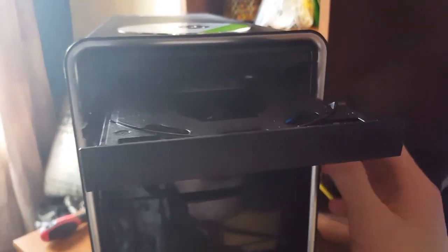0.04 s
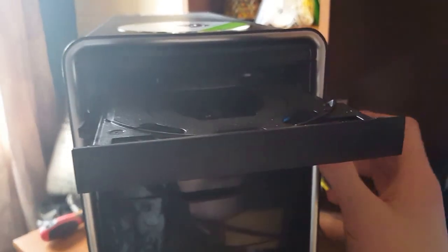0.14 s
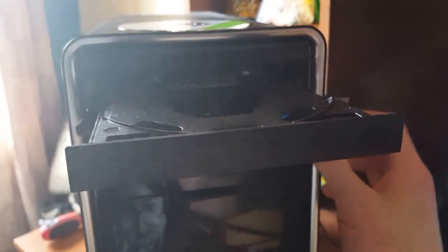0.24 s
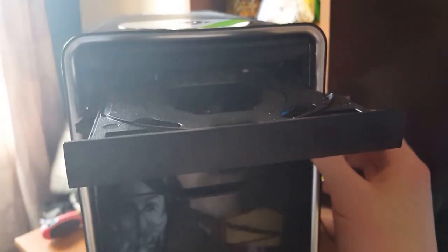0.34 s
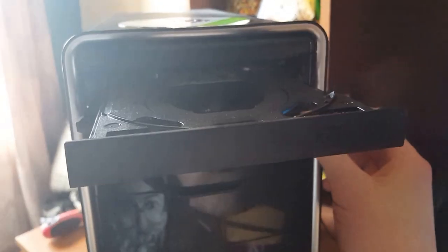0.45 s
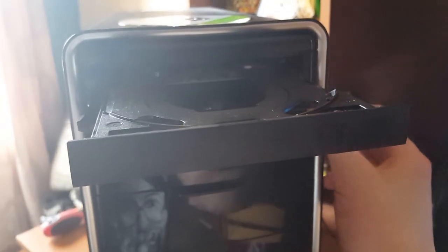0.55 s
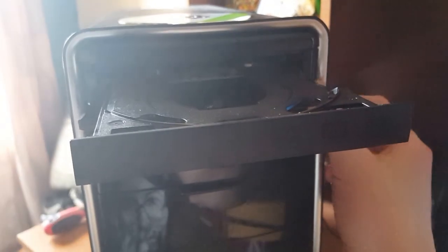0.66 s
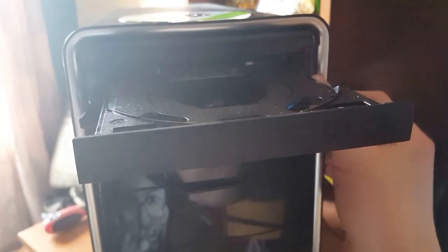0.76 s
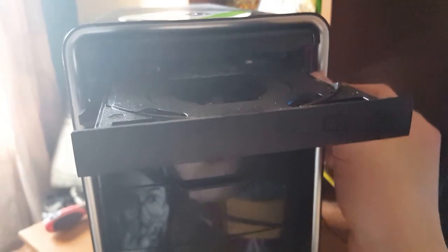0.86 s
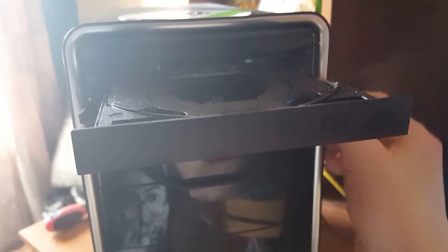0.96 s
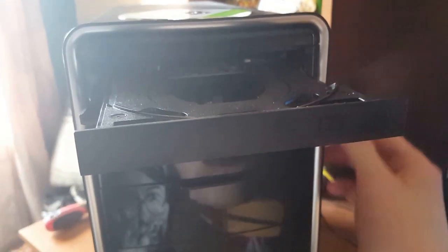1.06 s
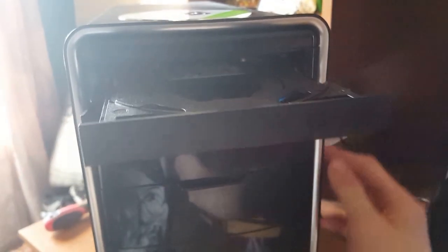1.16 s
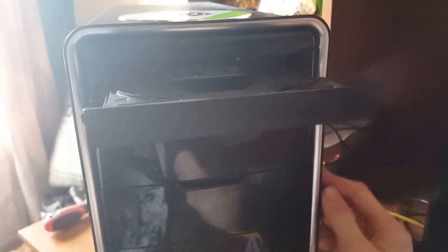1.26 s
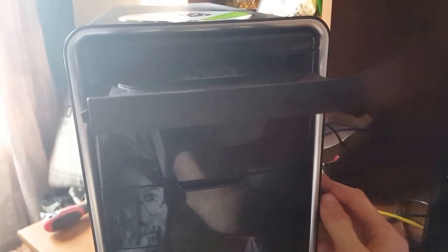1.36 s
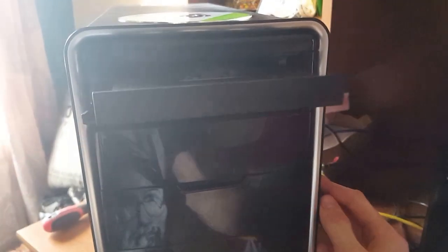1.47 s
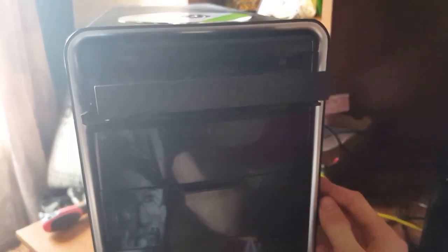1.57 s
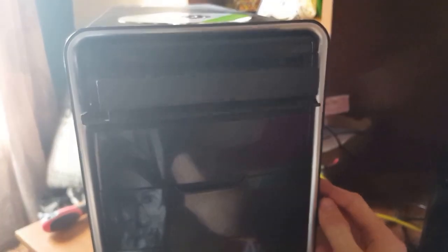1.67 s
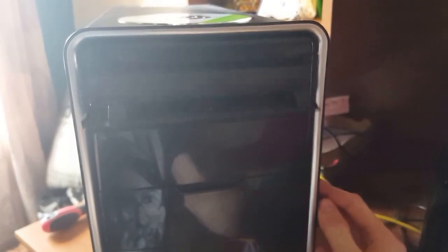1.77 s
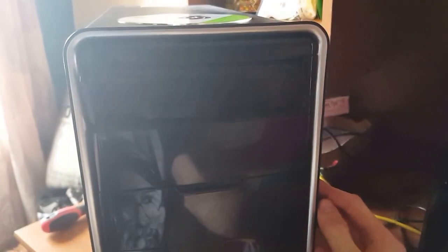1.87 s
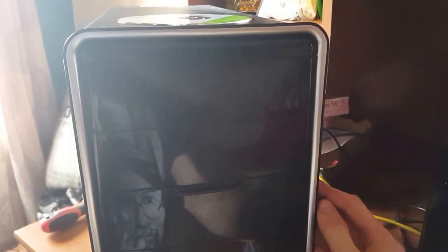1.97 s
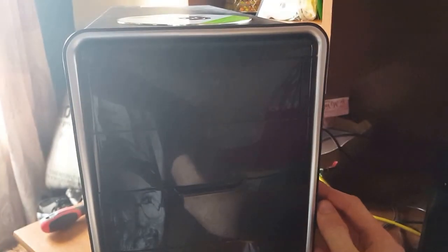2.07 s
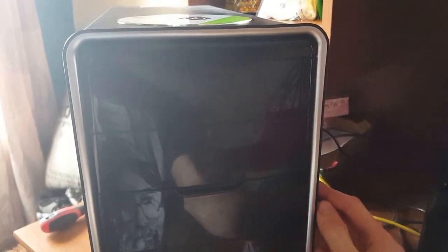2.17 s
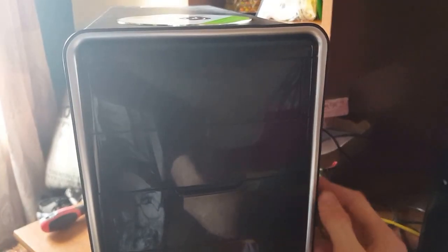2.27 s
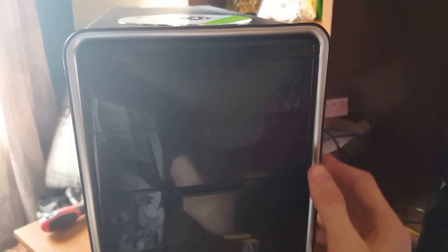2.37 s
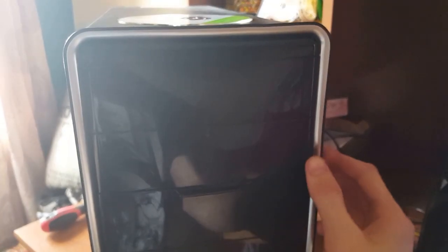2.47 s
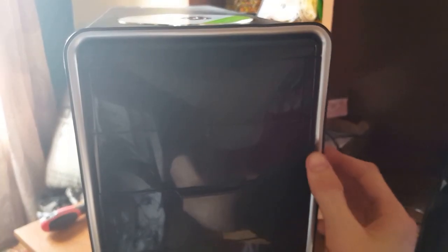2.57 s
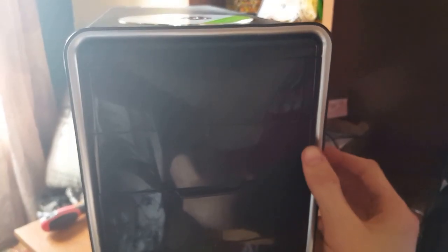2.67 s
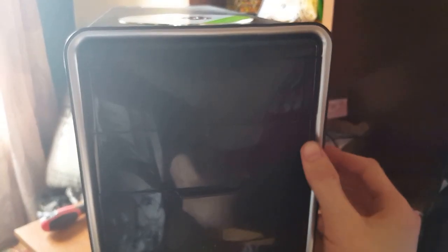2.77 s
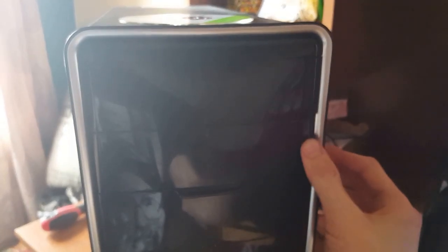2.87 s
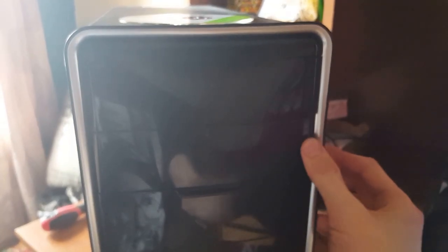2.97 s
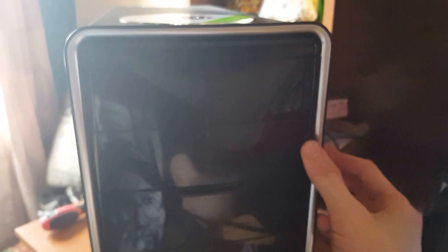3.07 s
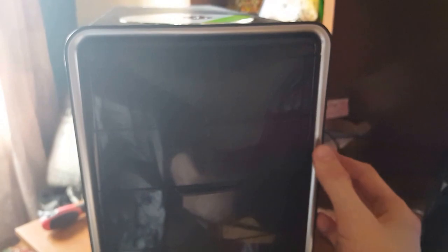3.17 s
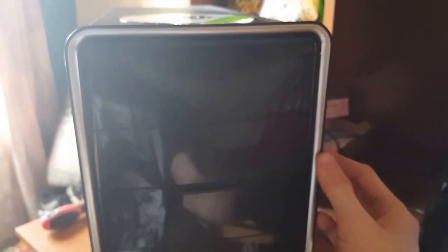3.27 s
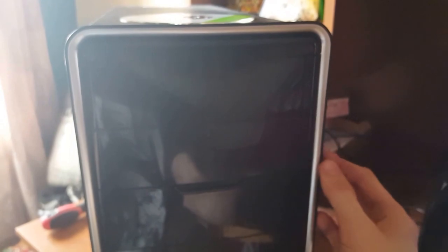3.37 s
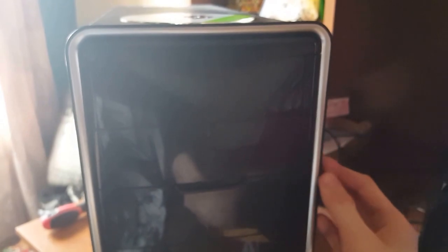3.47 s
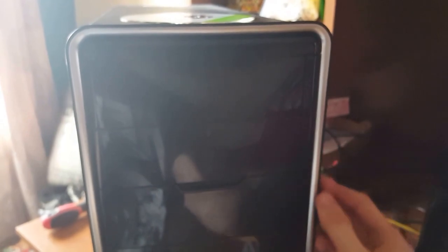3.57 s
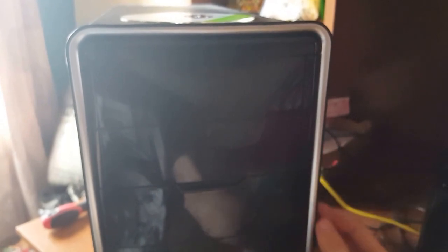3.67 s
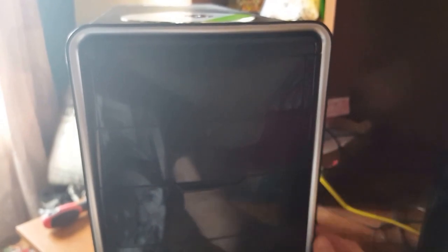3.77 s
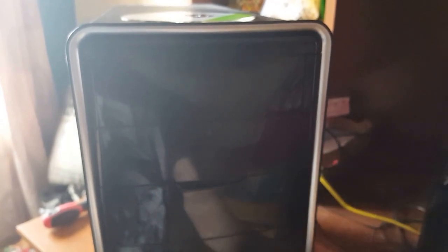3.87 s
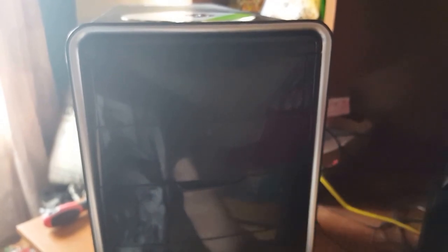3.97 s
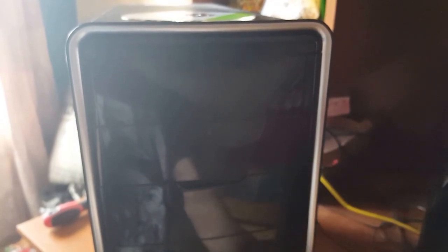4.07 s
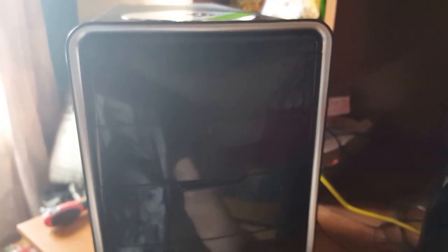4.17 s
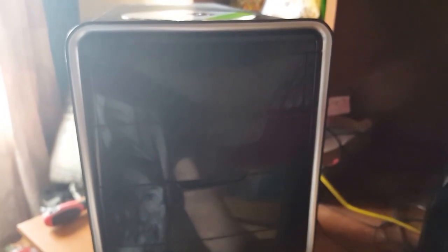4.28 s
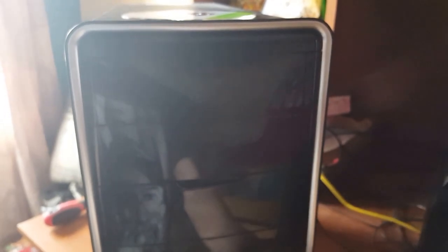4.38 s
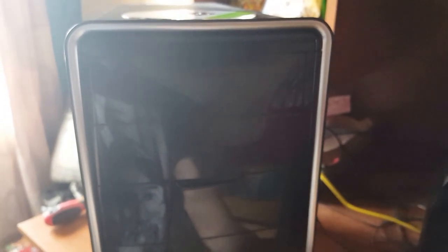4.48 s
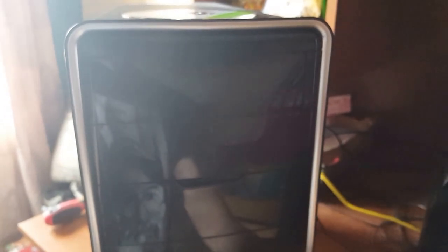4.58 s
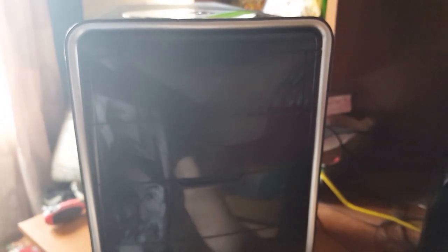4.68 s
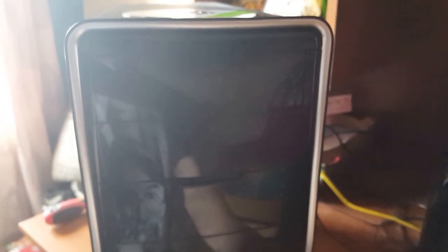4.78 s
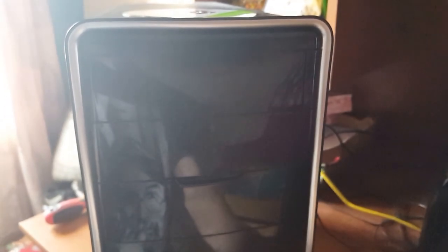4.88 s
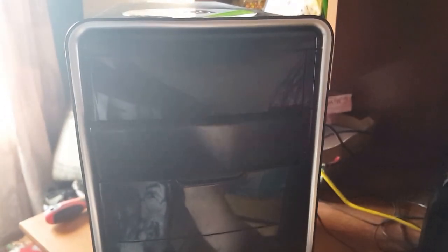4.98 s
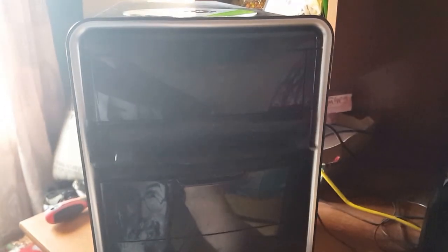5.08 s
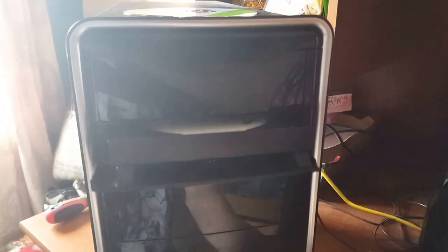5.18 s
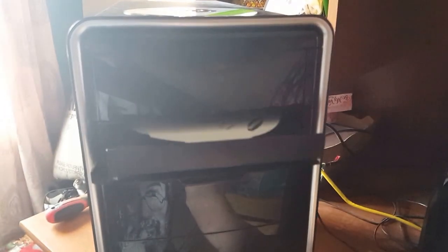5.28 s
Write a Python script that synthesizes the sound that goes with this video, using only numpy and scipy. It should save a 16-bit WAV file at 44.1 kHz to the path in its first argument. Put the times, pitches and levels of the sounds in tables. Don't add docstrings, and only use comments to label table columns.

```python
import sys
import numpy as np
from scipy import signal
from scipy.fft import rfft, irfft, next_fast_len
from scipy.io import wavfile
from scipy.ndimage import uniform_filter1d

SR = 44100
rng = np.random.default_rng(int(sys.argv[2]) if len(sys.argv) > 2 else 0)


def boost_factor(decibels):
    exponent = np.asarray(decibels, float) / 20
    return 10 ** exponent


def log_audio(samples):
    frames = np.atleast_2d(samples).T
    limited = np.clip(frames, -1, 1)
    pcm = np.round(limited * 32767).astype(np.int16)
    wavfile.write(sys.argv[1], SR, pcm)


N = 235229


def evened(x):
    return x / np.sqrt(np.mean(x ** 2) + 1e-20)


def early(x):
    return x / x[:880].std()


def read(points, hz):
    f, value = np.transpose(points)
    return np.interp(np.log(hz + 1), np.log(f + 1), value)


def add(mix, s, sound):
    part = mix[..., max(round(s * SR), 0):][..., :sound.shape[-1]]
    part += sound[..., :part.shape[-1]]


def decay(size, db_per_s):
    return boost_factor(-db_per_s * np.arange(size) / SR)


def highpass(x, order, hz):
    return signal.sosfilt(signal.butter(order, hz, "high", fs=SR, output="sos"), x)


def ring(x, modes, low_hz, high_hz):
    hz = np.fft.rfftfreq(x.shape[-1], 1 / SR) + 1
    body = 0
    for k, (f, width, db) in enumerate(modes):
        body = body + (-1) ** k * boost_factor(db) / (1 + 1j * (hz - f * f / hz) / width)
    low_cut = (1j * hz / low_hz / (1 + 1j * hz / low_hz)) ** 2
    high_cut = 1 / (1 + 1j * hz / high_hz) ** 2
    return irfft(rfft(x) * body * low_cut * high_cut, x.shape[-1])


def grit(size, per_s, uneven_db):
    hit, big, sign = rng.random(size), rng.exponential(1, size), rng.standard_normal(size)
    return (hit < per_s / SR) * boost_factor(uneven_db * np.minimum(big, 4)) * sign


def apart(x, lag):
    return np.array([x, np.roll(x, lag)])


def struck(modes):
    chance = rng.standard_normal((len(modes), 2))
    return [(f * (1 + .025 * a), width, db + 1.5 * b) for (f, width, db), (a, b) in zip(modes, chance)]


def chatter(peak_db, t60):
    t = np.arange(16384) / SR
    fade = boost_factor(-60 * t / max(t60, .01)) + 0.13 * boost_factor(-60 * t / 0.021)
    contacts = grit(len(t), 7000, 0.91) * fade * (t < .25) * (1 - np.exp(-t / 0.0005))
    contacts[[0, 30]] = .6, 3.4 * boost_factor(.35 * (peak_db + 30))
    return contacts


# frequency in Hz, width in Hz, level in dB.
SHELL = [(1468, 87, -8.5), (1734, 475, -7), (2050, 400, -0.5), (2230, 355, 3), (2450, 240, -3),
         (2800, 190, -13)]
PANEL = [(831, 233, -2), (1004, 57, 3), (1260, 230, -3.5)]
THUD = [(200, 140, -6), (274, 120, -3), (395, 110, -1), (448, 70, 2), (596, 160, -4.5)]


def click(push, peak_db, hz, thud_db, panel_db):
    shell = ring(push * decay(len(push), 150), struck(SHELL), 640, 9000)
    shell = shell + 0.7 * ring(shell + 1.2 * push, [(hz, 200, 0)], 100, 30000)
    panel = ring(push, struck(PANEL), 570, 2100)
    thud = ring(push * decay(len(push), 100), struck(THUD), 130, 2000)
    body = shell / abs(shell).max() + boost_factor(panel_db - 5.0) * early(panel) + boost_factor(thud_db - 8.5) * early(thud)
    return boost_factor(peak_db - 3.0) * body


# frequency in Hz, width in Hz, level in dB.
SNAP = [(3153, 470, 4.5), (4620, 360, 4), (5043, 170, 6.5), (5990, 870, 2.5)]
CRISP = [(7330, 740, 3), (7840, 680, 3.5)]
FIZZ = [(9000, 5100, 4), (12950, 2500, 4), (15500, 2000, 2.5)]


def edge(push, peak_db, crisp_db, fizz_db):
    push = np.clip(push, -4, 4) * decay(len(push), 420)
    snap = ring(push, struck(SNAP), 3300, 12000)
    crisp = ring(push, struck(CRISP), 4500, 12000)
    fizz = ring(push * decay(len(push), 500), struck(FIZZ), 8000, 30000)
    bright = snap / abs(snap).max() + boost_factor(crisp_db) * early(crisp) - boost_factor(fizz_db + 1.0) * early(fizz)
    return boost_factor(peak_db + 1.0) * apart(bright, rng.integers(0, 14))


def knocks(rows, t60, panel_db, crisp_db, fizz_db):
    out = np.zeros((2, N))
    usual_db = np.mean(rows, axis=0)[1]
    for s, peak_db, hz, thud_db, edge_db in rows:
        push = chatter(peak_db, t60 * boost_factor(-0.26 * (peak_db - usual_db)))
        shine_db = -0.26 * edge_db
        moved_db = panel_db + 0.078 * (thud_db + 13.5) - 0.19 * (peak_db + 33)
        add(out, s, click(push, peak_db, hz, thud_db, moved_db))
        add(out, s, edge(push, peak_db + edge_db, crisp_db + shine_db, fizz_db + shine_db))
    return out


# chatter t60 in seconds, panel in dB, crisp in dB, fizz in dB.
FINGER = [(.0216, -37.5, 2360, -16, -8.5), (.106, -34.5, 1960, -13, -16.5), (.1855, -38.5, 2110, -16, -12),
          (.195, -35.5, 905, -19, -2), (.3635, -38.5, 2360, -13, -1.5), (.539, -50.5, 1680, -9, -13),
          (.5806, -30, 1550, -14, -6), (.695, -52, 1970, -39, -6), (.811, -18, 1630, -57, -14),
          (.873, -49.5, 902, -4, -8), (.961, -38, 2330, -28, -22), (.969, -31, 1560, -10, -7),
          (.991, -52, 1100, -30, 1), (1.0293, -27, 1500, -32, -5), (1.095, -48.5, 2270, -30, -11)]
FINGER_KIND = (0.1535, -9.5, -18.5, -28)
TAPS = [
    (2.353, -47, 2050, -31, -17.5),
    (2.742, -46, 2130, -26, -8.5),
    (2.906, -51, 1420, -27, -10),
    (2.9225, -23, 1550, -25.5, -13),
    (3.183, -37.5, 1720, -13.5, -7.5),
    (3.334, -55.5, 2260, -36, -19),
]
TAP_KIND = (0.26, -9, -24, -26.5)
PADS = [
    (.4505, -35, 3340, -31, -17),
    (.763, -44.5, 1550, -43, -17),
    (3.1, -37.5, 1180, -8.5, -16.5),
]
PAD_KIND = (0.11, -9, -29, -46)


def finger():
    return knocks(FINGER, *FINGER_KIND) + knocks(TAPS, *TAP_KIND) + knocks(PADS, *PAD_KIND)


INWARD = [(1.338, -39, 2130, -24, -20), (1.375, -43.5, 1290, -10.5, -2.5), (1.418, -35.5, 1190, 0, -15),
          (1.451, -32, 2270, -11, -4.5), (1.534, -41, 2150, -15, -3), (1.566, -29, 2260, -26, -12.5),
          (1.585, -30.5, 2370, -4, -9), (1.764, -24, 2230, -11, -9.5), (1.784, -23.5, 3240, -7.5, -3.5),
          (1.811, -31, 1200, 4.5, -4), (1.842, -35.5, 1200, -4, -3.5)]
INWARD_KIND = (0.13, -11, -18.5, -29)
OUTWARD = [(4.772, -50, 2550, -7.5, -16), (4.839, -44.5, 1600, -7, -14), (4.861, -37.5, 1410, 2.5, -18),
           (4.884, -36.5, 1500, -9, -18), (4.911, -32.5, 1410, -2, -9.5), (4.972, -29, 2270, -10, -25),
           (4.998, -20, 1093, -14, -12), (5.034, -37, 2550, -4, -11), (5.087, -32.5, 1120, -7.5, -8.5),
           (5.214, -34.5, 2195, -30, -7), (5.259, -24, 2500, -27, -16)]
OUTWARD_KIND = (0.13, -8.5, -22.5, -30.5)


def tray():
    return knocks(INWARD, *INWARD_KIND) + knocks(OUTWARD, *OUTWARD_KIND)


LATCH = [
    (1.998, -30, 2360, -19.5, -15),
    (2.021, -8, 2450, -20, -9.5),
]
LATCH_KIND = (0.18, -8.5, -20, -21)
CLAMP = [
    (2.137, -25.5, 1330, -3.5, -27.5),
    (2.145, -18, 1618, -2, -20.5),
    (2.164, -24.5, 1240, -12.5, -9),
]
CLAMP_KIND = (0.14, -5.5, -17, -25)
TICKS = [
    (1.175, -37, 600, -4, -17),
    (1.209, -42.5, 2270, -16, -11.5),
    (1.505, -44, 1150, 7.5, -9),
    (1.887, -47, 2000, -25, 2),
    (1.904, -38.5, 2270, -8.5, -6.5),
    (5.158, -32.5, 2600, -6.5, -9),
]
TICK_KIND = (0.09, -9.5, -12, -22)
FLAP = [
    (5.28, -14, 2050, -26, -6),
    (5.304, -20.5, 2430, -26, 0),
]
FLAP_KIND = (.2, -14.5, -21, -26)


def door():
    shut = knocks(LATCH, *LATCH_KIND) + knocks(CLAMP, *CLAMP_KIND)
    return shut + knocks(TICKS, *TICK_KIND) + knocks(FLAP, *FLAP_KIND)


# frequency in Hz, width in Hz, level in dB.
RACK = [(589, 56, -10.5), (918, 750, -4.5), (1170, 45, 10.5), (1550, 400, -6), (1970, 99, -19),
        (2270, 470, 3.5), (2440, 200, -12)]
RAILS = [(3114, 670, -6), (4170, 220, 5), (5000, 300, 2), (5770, 873, -10), (7550, 600, -4),
         (13220, 1300, -13.5), (15400, 1700, -19)]


def travel(load, rumble_db, hiss_db, rise_db):
    s, load_db = np.transpose(load)
    t = s[0] + np.arange(next_fast_len(int((s[-1] - s[0]) * SR))) / SR
    mid_load_db = -50
    over_db = np.interp(t, s, load_db) - mid_load_db
    judder = boost_factor(2.8 * evened(uniform_filter1d(rng.standard_normal(len(t)), 300)))
    teeth = judder * grit(len(t), 4500, 2.6)
    rack = boost_factor(over_db + 1.0) * evened(ring(teeth, RACK, 510, 3400))
    rumble = boost_factor(1.4 * over_db + rumble_db) * evened(ring(teeth, THUD, 62, 1200))
    rails = 0.24 * apart(teeth, 1) + 2.9 * judder * grit((2, len(t)), 3500, 1.4)
    friction_db = 0.99 * over_db + hiss_db + 3.5 + rise_db * (t - s[0])
    hiss = boost_factor(friction_db) * evened(ring(rails, RAILS, 1700, 28000))
    return s[0], boost_factor(mid_load_db) * (rack + rumble + hiss) * signal.windows.tukey(len(t), .02)


# time in seconds, level in dB.
LOAD_IN = [(1.165, -62), (1.28, -54.5), (1.4, -50.5), (1.48, -48), (1.6, -51.5), (1.72, -58), (1.78, -50),
           (1.87, -49), (1.99, -56)]
LOAD_SHUT = [(1.981, -63.5), (2.06, -49.5), (2.13, -57.5), (2.21, -59), (2.3, -77.5)]
LOAD_OUT = [(4.761, -62.5), (4.84, -71), (4.9, -50), (4.96, -52.5), (5.05, -53.5), (5.14, -57.5),
            (5.24, -51), (5.334, -45)]
# rumble in dB, hiss in dB, hiss gained in dB per second.
STROKES = [
    (-1.5, -9.5, -2),
    (3, -5.5, -3),
    (0, -21.5, 28),
]


def motor():
    out = np.zeros((2, N))
    for load, layers in zip([LOAD_IN, LOAD_SHUT, LOAD_OUT], STROKES):
        add(out, *travel(load, *layers))
    return out


def bump(peak_db, hz):
    t = np.arange(6000) / SR
    swing = np.cos(2 * np.pi * hz * t) + 0.52 * np.cos(2 * np.pi * 2.3 * hz * t)
    soft_start = (1 - np.exp(-t / 0.0023)) ** 2
    return highpass(boost_factor(peak_db + 4.0 - 1740 * t) * swing * soft_start, 2, 70)


# start in seconds, peak in dB, frequency in Hz.
BUMPS = [
    (0.869, -35.5, 142),
    (1.071, -36, 136),
    (2.017, -27.5, 242),
    (2.169, -29.5, 113),
]


def case_bumps():
    out = np.zeros(N)
    for s, *row in BUMPS:
        add(out, s, bump(*row))
    return out


def shaped(x, spectrum):
    return evened(irfft(rfft(x) * boost_factor(read(spectrum, np.fft.rfftfreq(N, 1 / SR))), N))


# frequency in Hz, level in dB per Hz.
SKIN = [(200, -31), (320, -18.5), (500, -10), (1000, -4.5), (1500, -3), (2400, -4), (2800, -15.5),
        (4000, -18.5), (5500, -20), (6500, -18.5), (7600, -13.5), (9400, -44), (12700, -20), (15700, -27.5)]
# middle in seconds, fading in dB per second, skin in dB, rumble in dB.
WIPES = [
    (.06, 120, -63, -54.5),
    (.6, 2.5, -71, -67.5),
    (1.12, 78.5, -61.5, -69),
    (2.3, 54.5, -68, -91.5),
    (3.05, 26.5, -77, -75),
    (3.67, 90.5, -55.5, -81),
    (3.94, 86, -60.5, -75.5),
]


def brush():
    t = np.arange(N) / SR
    skin = shaped(grit(N, 6900, 2.0) + 3.9 * grit((2, N), 5000, 1.4), SKIN)
    rumble = evened(ring(grit(N, 600, 0.83), [(152, 230, -2.5), (240, 69, 6.5), (330, 66, -4.5)], 80, 870))
    s, fade_db, skin_db, rumble_db = np.transpose(WIPES)
    swell = boost_factor(-fade_db * abs(t[:, None] - s))
    return (swell @ boost_factor(skin_db)) * skin + (swell @ boost_factor(rumble_db)) * rumble


# time in seconds, level in dB.
WHINE = [(3.27, -100), (3.36, -81), (3.47, -75), (3.58, -91), (3.7, -84), (3.82, -76), (4.0, -91),
         (4.1, -100)]


def whine():
    t = np.arange(N) / SR
    level_db = np.interp(t, *np.transpose(WHINE), left=-120, right=-120)
    band = ring(rng.standard_normal(N), [(13100, 400, 0)], 100, 30000)
    band = ring(band, [(12840, 700, 0)], 100, 30000)
    line = ring(rng.standard_normal(N), [(14260, 40, 0)], 100, 30000) * (t > 4.3) * (t < 4.85)
    return boost_factor(level_db) * evened(band) + boost_factor(-100) * evened(line)


# frequency in Hz, left over right in dB.
LEAN = [(300, -1), (1000, 0), (1550, 7.5), (2400, 10.5), (3100, 0), (4000, -3.5), (5500, 14.5),
        (7000, -13.5), (8100, 17), (9500, 5), (15000, 6.5)]
# frequency in Hz, phase by which left leads in radians.
LEAD = [(300, 0), (1000, .1), (1550, .3), (2070, -1.1), (2600, -1.3), (3100, -2.2), (4000, -1.6)]


def ports(x):
    hz = np.fft.rfftfreq(N, 1 / SR)
    half = boost_factor(.5 * read(LEAN, hz))
    return irfft(rfft(x) * np.array([half, np.exp(-1j * read(LEAD, hz)) / half]), N)


# frequency in Hz, t60 in seconds.
ROOM = [(200, 0.41), (1000, 0.12), (4000, 0.046), (12000, 0.074)]


def room(x):
    taps = np.zeros((2, SR // 2))
    at = np.arange(200, SR // 2 - 20, 20) + rng.integers(0, 20, (2, (SR // 2 - 201) // 20))
    np.put_along_axis(taps, at, rng.choice([-1., 1.], at.shape), 1)
    hz, t, z = signal.stft(taps, SR, nperseg=256)
    wide = hz / (hz + 300)
    z = z.mean(0) + wide[:, None] * (z - z.mean(0))
    tail = signal.istft(z * boost_factor(-60 * t / read(ROOM, hz)[:, None]), SR, nperseg=256)[1]
    return signal.fftconvolve(x, tail / np.linalg.norm(tail[0]), axes=1)[:, :N]


# frequency in Hz, level in dB.
AIR = [(26, -42.5), (45, -6), (70, -7.5), (123, -3), (173, -19.5), (238, -13.5), (735, -19), (894, -14.5),
       (1110, -22), (2320, -23.5), (3270, -32), (7170, -29), (9160, -41), (15700, -35)]
# frequency in Hz, likeness of the two ports from -1 to 1.
AIR_SAME = [(60, 0.61), (180, 0.16), (550, -0.26), (1650, 0.66), (4970, -0.073), (15000, -0.27)]
# frequency in Hz, left over right in dB.
AIR_LEAN = [(60, 3), (180, -4.5), (550, 0), (1650, -4), (4970, -0.7), (15000, -1.5)]


def air():
    frames, hz = N // 512 + 5, np.fft.rfftfreq(2048, 1 / SR)
    a, b, c, d, patches = rng.standard_normal((frames, 1025, 5)).T
    patches = evened(uniform_filter1d(uniform_filter1d(patches, 20, 0), 6, 1))
    same = np.clip(read(AIR_SAME, hz), -1, 1)[:, None]
    left = a + 1j * b
    z = np.array([left, same * left + np.sqrt(1 - same ** 2) * (c + 1j * d)])
    lean_db = np.multiply.outer([.5, -.5], read(AIR_LEAN, hz))[..., None]
    z *= boost_factor(read(AIR, hz)[:, None] + 1.5 * patches + lean_db)
    hiss = signal.istft(z, nperseg=2048, noverlap=1536)[1][:, :N]
    return boost_factor(-69) * hiss / highpass(hiss.mean(0), 4, 200).std()


# frequency in Hz, level in dB rms.
HUM = (120, -58.5)
# frequency in Hz, level in dB rms.
TONES = [(875, -81), (541, -88), (1363, -85), (5780, -93), (11520, -96)]


def hum():
    t = np.arange(N) / SR
    hum_hz, hum_db = HUM
    lines = boost_factor(hum_db + 3.5 - .5 * t) * np.sin(2 * np.pi * hum_hz * t)
    for tone_hz, db in TONES:
        drift = evened(uniform_filter1d(rng.standard_normal(N), 6000))
        phase = 2 * np.pi * np.cumsum(tone_hz * (1 + 0.00058 * drift)) / SR
        lines = lines + boost_factor(db + 3.5 + 0.58 * drift) * np.sin(phase)
    return lines


def scene():
    near = ports(finger() + tray() + door() + motor() + brush() + whine())
    return near + boost_factor(-12) * room(near.mean(0)[None]) + case_bumps() + air() + hum()


def top_cut(x):
    return signal.sosfilt(signal.butter(12, 15720, fs=SR, output="sos"), x)


def record(dry):
    heard = highpass(dry, 2, 32)
    return top_cut(heard - .0005)


dry = scene()
out = record(dry)
log_audio(out)
```